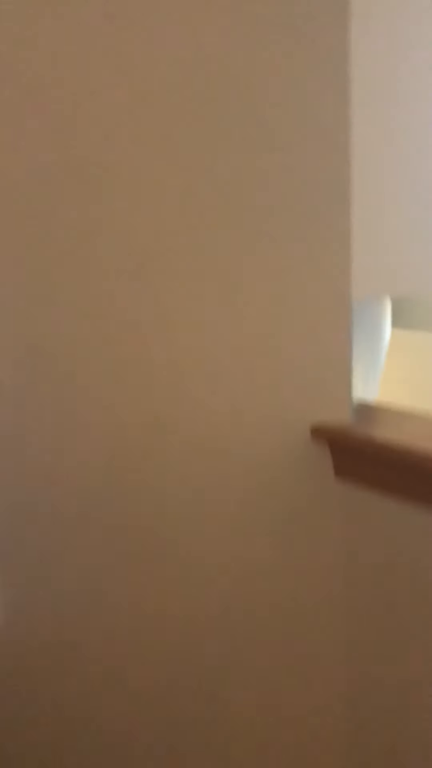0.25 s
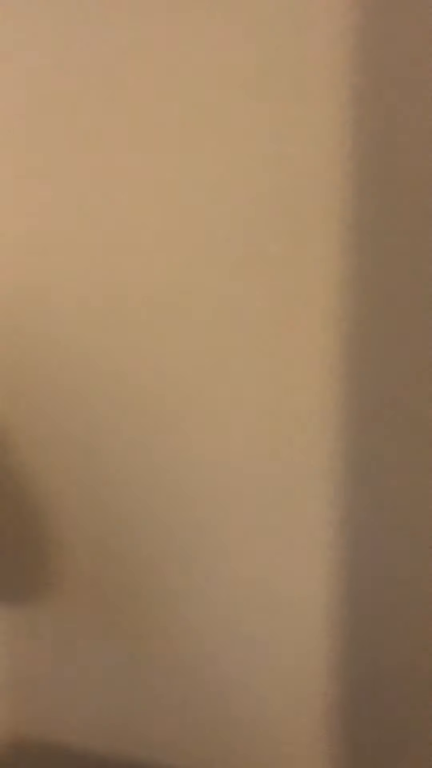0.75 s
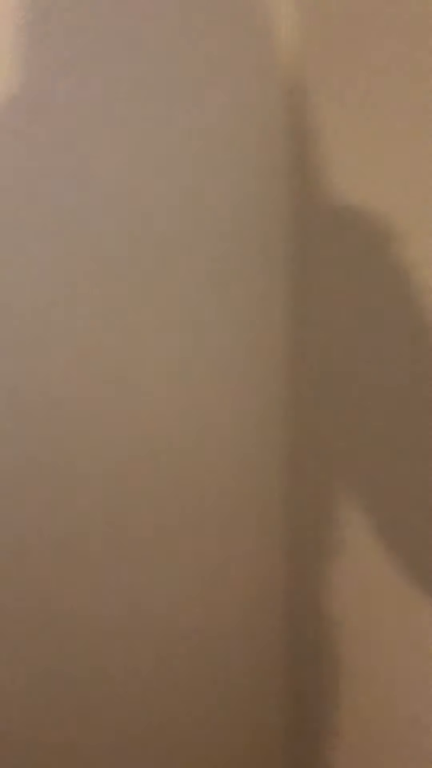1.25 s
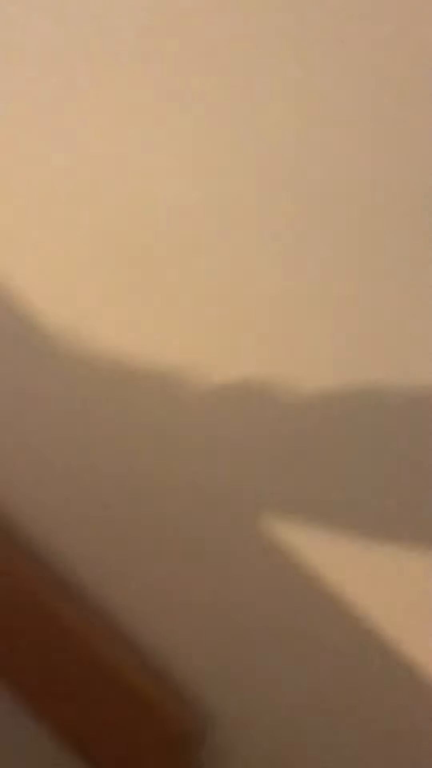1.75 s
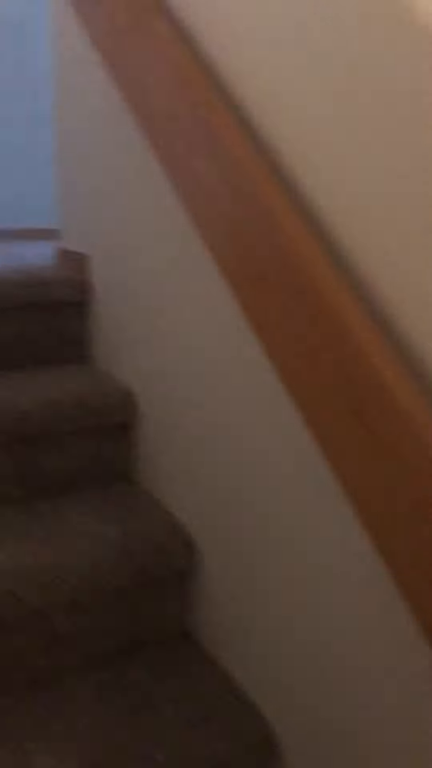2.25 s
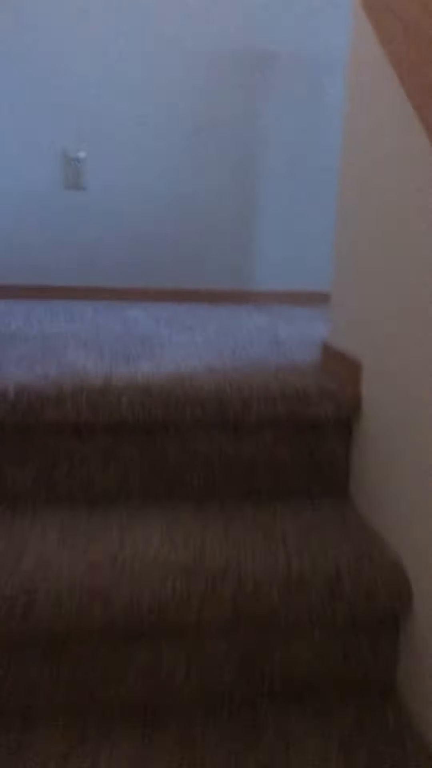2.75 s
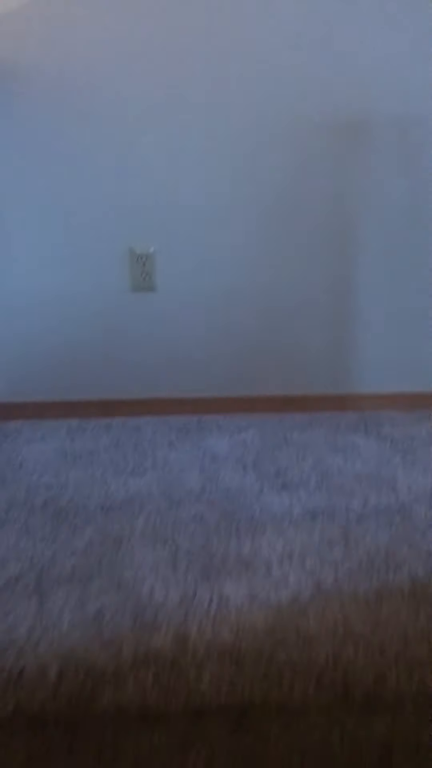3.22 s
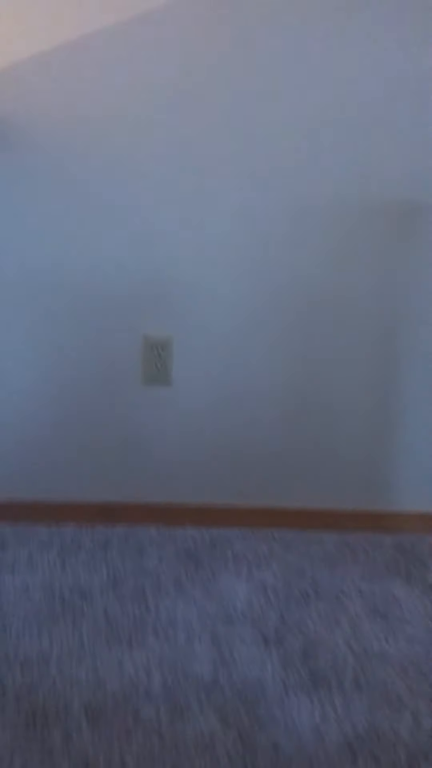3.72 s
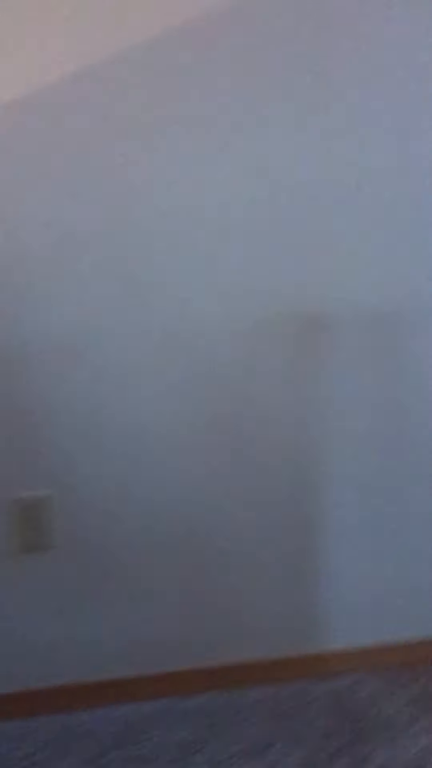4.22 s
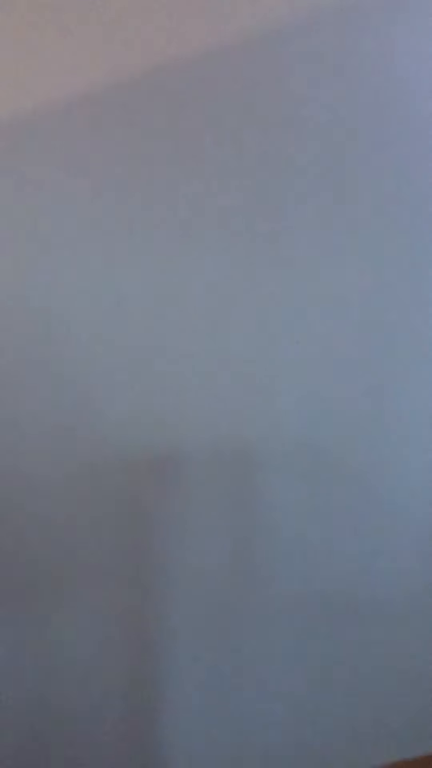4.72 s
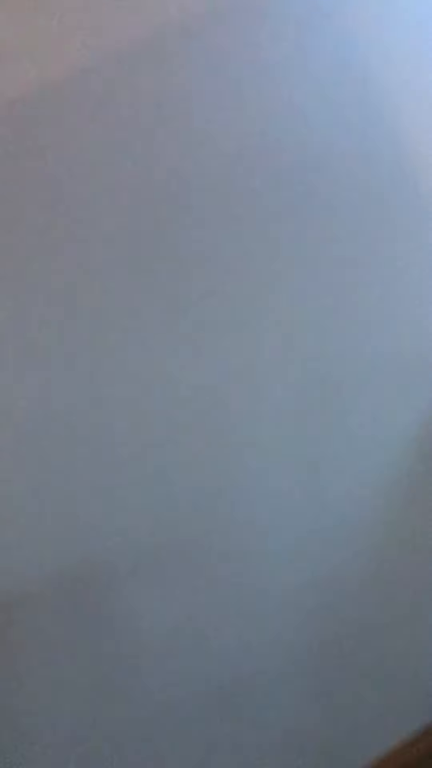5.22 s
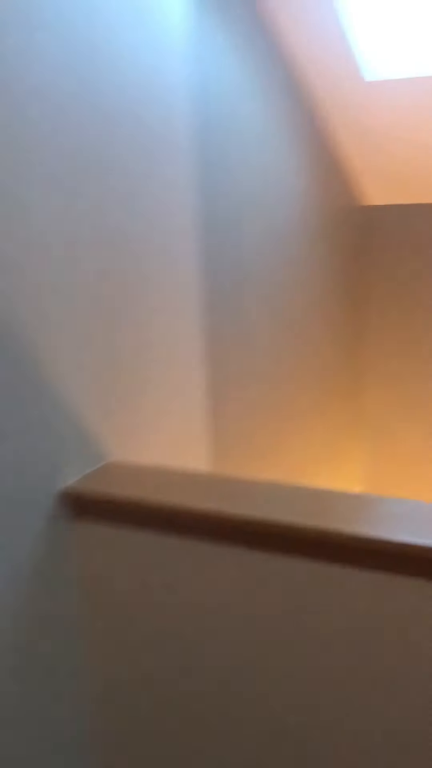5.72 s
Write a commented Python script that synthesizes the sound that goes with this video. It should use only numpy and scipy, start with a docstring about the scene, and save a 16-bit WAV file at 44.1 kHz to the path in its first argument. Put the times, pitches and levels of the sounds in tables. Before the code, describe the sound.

A person climbs carpeted wooden stairs, then walks across a carpeted landing. Each step is a dull, bassy thump with a soft puff of pile and tiny ticks of shoe or laces. Steps come about every half second, strongest around the middle. Clothes rustle faintly, boards creak very softly, a distant motor hums. A handheld phone close to the walker picks up a short bare-stairwell echo.

```python
"""A deep, soft footfall comes first: someone climbs carpeted wooden stairs and crosses a landing, phone in hand.
Footfalls ring the joists as fading sine waves; trapped air knocks as short swelling sines.
Puffs from the pile, ticks of shoe and laces and rubbing cloth are short bursts of coloured noise.
Behind them the frame rumbles, boards creak, feet shuffle and clothes rustle under a fine hiss (shaped noise).
A far motor hums on multiples of its speed, and the bare stairwell answers with fading random echoes."""
import sys
import numpy as np
from scipy import signal
from scipy.fft import rfft, irfft, next_fast_len
from scipy.io import wavfile
from scipy.ndimage import uniform_filter1d, map_coordinates

SR = 44100
rng = np.random.default_rng(int(sys.argv[2]) if len(sys.argv) > 2 else 0)


def digitize_waveform(pressure):
    """Quantize a signal to 16-bit integers and store it at the path in sys.argv[1].

    Rows of a 2-D input are taken as channels; values are limited to [-1, 1].
    """
    field = np.atleast_2d(pressure).T
    bounded = np.clip(field, -1, 1)
    quanta = np.round(bounded * 32767).astype(np.int16)
    wavfile.write(sys.argv[1], SR, quanta)


N = 263232  # length in samples

# Pushes on the treads, from heel knock to the weight rolling over:
# [t/s, peak level/dB, best driven f/Hz, spread/octaves, t60/s at that pitch]; t60 = time to fade by 60 dB
TREAD_PUSHES = [(0.0, -26.5, 61.6, 0.36, 0.35), (0.004, -37, 215, 0.52, 0.083),
                (0.096, -40.5, 59, 0.65, 0.38), (0.386, -36, 244, 0.41, 0.11),
                (0.414, -30.5, 55.5, 0.6, 0.34), (0.459, -25.5, 53.3, 0.19, 0.29),
                (0.622, -48, 62, 0.55, 0.094), (0.929, -31, 92, .22, 0.41), (0.944, -32.5, 208, 0.36, 0.11),
                (0.951, -23, 90.6, 0.2, 0.21), (0.991, -43, 96, .48, 0.064), (1.039, -32, 93, 0.36, 0.14),
                (1.475, -38, 82.4, .32, 0.29), (1.543, -39, 66, 0.42, 0.39), (1.65, -39.5, 87, 0.2, 0.15),
                (1.663, -46.5, 265, 0.23, 0.21), (1.686, -36, 81.8, 0.39, .18),
                (1.751, -37.5, 91, 0.61, .15), (1.824, -48, 265, 0.15, 0.15), (1.827, -39.5, 80, 0.41, .18),
                (2.008, -41.5, 295, 0.24, 0.14), (2.052, -33.5, 90, 0.41, 0.17),
                (2.121, -54, 74, .28, 0.46), (2.488, -43.5, 96.5, 0.22, 0.16),
                (2.557, -37.5, 79, 0.12, 0.55), (2.616, -39, 233, 0.39, 0.19), (2.639, -33, 67.6, .5, 0.27),
                (2.659, -25.5, 76, 0.16, 0.25), (2.704, -46, 73, 0.37, 0.21),
                (2.758, -44.5, 59.3, .5, 0.51), (2.837, -37.5, 69.7, 0.14, 0.13),
                (3.108, -35.5, 251, 0.64, 0.16), (3.111, -23.5, 94.3, 0.4, 0.23),
                (3.139, -20, 57.3, 0.4, 0.23), (3.172, -41, 71, 0.36, 0.15), (3.26, -41, 51, 0.38, .22),
                (3.329, -39.5, 56.4, 0.2, 0.64), (3.542, -30.5, 230, 0.33, 0.25),
                (3.542, -23.5, 102, 0.34, 0.24), (3.559, -20.5, 85, 0.41, 0.13),
                (3.619, -36, 79.5, 0.65, 0.11), (3.682, -33, 49, 0.34, 0.35), (3.964, -25, 173, 0.52, 0.29),
                (3.984, -22.5, 153, 0.26, 0.092), (4.022, -33.5, 143, 0.32, 0.18),
                (4.04, -50, 77, 0.56, .22), (4.082, -33, 81, 0.63, 0.14), (4.14, -42, 144, 0.21, .09),
                (4.19, -37, 63, 0.35, 0.076), (4.27, -47, 72.6, 0.23, 0.38),
                (4.446, -36.5, 198, 0.51, 0.27), (4.447, -33, 99, .36, 0.15), (4.47, -33, 89, 0.26, 0.11),
                (4.529, -37.5, 68.5, 0.51, .2), (4.62, -39, 72, 0.35, 0.11), (4.955, -35.5, 236, 0.3, 0.28),
                (5.0, -37.5, 55.4, .32, 0.098), (5.04, -37.5, 69.3, .5, 0.29),
                (5.133, -52.5, 307, 0.17, 0.46), (5.516, -32, 76.6, 0.22, 0.48),
                (5.531, -40.5, 126.6, 0.14, 0.31), (5.534, -27, 75.5, 0.13, 0.32),
                (5.564, -47.5, 233, 0.13, 0.38), (5.597, -42, 71, .3, 0.47)]
# Ringing modes of the joists: [f/Hz, level/dB]
JOIST_MODES = [(40, 11), (48, 0.5), (54, 2.5), (62, -0.5), (70, 2), (84, 5), (101, 7), (124, 9), (148, 9.5),
               (178, 5.5), (215, 0.5), (255, 0.5), (310, 2.5), (370, 8), (440, 0)]
# Air pockets slapped shut under the sole: [t/s, peak level/dB, f/Hz]
AIR_KNOCKS = [(0.394, -32.5, 1230), (0.428, -49, 1200), (0.941, -44, 536), (0.947, -37.5, 900),
              (1.564, -47, 794), (1.782, -54, 683), (2.202, -48, 1360), (2.612, -31, 1225),
              (2.687, -45, 563), (3.543, -28.5, 1260), (3.964, -41, 1250), (3.966, -48, 543),
              (4.481, -45.5, 1360), (5.508, -32.5, 1350), (5.515, -41, 1080)]
# The sole crushes the pile: [t/s, level/dB, slope/dB per octave, t60/s]
PILE_PUFFS = [(0.0, -38.5, -6.5, 0.029), (0.38, -47, -5.5, 0.25), (0.917, -38, -6, 0.12),
              (0.94, -30.5, -11.5, 0.047), (1.471, -46.5, -5, 0.21), (1.564, -51.5, -5, 0.2),
              (1.672, -54.5, -4, 0.05), (2.012, -43.5, -9, 0.097), (2.551, -54, -4.5, .13),
              (2.682, -40, -7.5, 0.065), (3.106, -44, -7.5, 0.15), (3.541, -41, -5.5, 0.088),
              (3.558, -40, -28, 0.047), (3.962, -43, -6.5, 0.097), (4.444, -44.5, -5, 0.076),
              (4.959, -48.5, -6, 0.14), (5.079, -55.5, -8, 0.16), (5.495, -43.5, -5.5, 0.13),
              (5.591, -52.5, -5.5, 0.21)]
# Ticks of shoe and laces: [t/s, level/dB, f/Hz, share of broad grit, treble level/dB against the rest]
SHOE_TICKS = [(0.0968, -52.5, 2370, 0.66, -21), (0.1158, -47.5, 3800, 0.16, -22),
              (0.1832, -49.5, 2630, .13, -28), (0.271, -53, 1870, 0.87, -8),
              (0.393, -45.5, 1890, 0.7, -4.5), (0.4727, -42.5, 3350, .17, -13),
              (0.5537, -47.5, 4340, 0.75, -20), (1.1009, -50, 3750, 0.17, -28),
              (1.204, -46, 3440, 0.21, -28), (1.5628, -47, 1920, 0.9, -8), (1.6751, -44, 1630, 0.095, -20),
              (2.0106, -54.5, 3670, .4, -26), (2.2009, -49.5, 1920, 0.059, -10.5),
              (2.552, -54.5, 1990, .31, -14), (2.612, -33, 4150, .5, -17), (2.6125, -35.5, 6300, 0.29, -13),
              (2.6818, -41.5, 3560, 0.31, -42), (2.7965, -43.5, 3700, .26, -30),
              (2.9574, -55.5, 3300, 0.16, -25), (3.11, -49.5, 1820, 0.26, -27),
              (3.2472, -55.5, 3670, 0.4, 0.5), (3.407, -48.5, 2550, 0.18, -31), (3.5413, -41, 2730, 1, -8),
              (3.65, -46, 3380, 0.43, -11.5), (3.7537, -47, 4000, 0.29, -18), (3.921, -43, 4150, 0.19, -28),
              (3.937, -50, 4200, .6, -10), (3.9625, -44, 1970, .4, -38), (4.1016, -52.5, 3640, .3, -1.5),
              (4.2419, -51, 2580, 0.11, -34), (4.521, -54.5, 3930, .54, -6), (4.555, -44.5, 3350, 0.79, -7),
              (4.645, -45.5, 4370, 0.67, -9), (4.818, -52.5, 2650, 0.24, -30), (4.85, -51.5, 2400, .5, -18),
              (4.864, -51.5, 2300, 0.49, -15), (4.92, -54.5, 3900, 0.2, -26),
              (4.9587, -51.5, 1800, 0.22, -6), (5.27, -54, 2700, 0.23, -29),
              (5.5068, -36.5, 2320, .97, -13), (5.5924, -45.5, 2070, 0.84, -6),
              (5.6858, -44.5, 3900, 0.47, -16), (5.9315, -57, 1940, 0.44, -27)]
# Cloth and sole rub: [t/s, level/dB, f/Hz, treble level/dB against the rest, length/s]
CLOTH_RUBS = [(0.1, -69, 2700, 0, 0.095), (0.553, -59.5, 4280, 0, 0.02), (0.742, -69, 2390, -25, 0.035),
              (0.805, -55.5, 2450, -16, 0.031), (0.9203, -51, 3770, -26, 0.015),
              (1.1004, -56.5, 3780, -13, 0.037), (1.122, -55.5, 3300, -18, 0.034),
              (1.477, -66.5, 2500, -24, 0.075), (2.628, -64, 6100, -10, 0.013),
              (2.815, -60, 3930, -30, 0.016), (2.9875, -56, 2600, -21, 0.027), (3.262, -72, 3260, 2, 0.029),
              (3.3376, -56.5, 3230, -25, 0.038), (3.534, -66, 2670, -5, .03),
              (3.658, -65, 3430, -11, 0.018), (3.797, -75, 2940, -21, .023),
              (3.855, -58.5, 2790, -29, 0.012), (3.884, -54, 2980, -19, .02),
              (3.922, -52.5, 4070, -17, 0.026), (4.1524, -57, 3470, -7.5, 0.04),
              (4.431, -65.5, 3260, -4, 0.028), (4.6594, -69.5, 2960, -11, 0.061),
              (4.845, -57, 2420, -14, 0.028), (5.1744, -61.5, 3530, -10, 0.063),
              (5.687, -64, 3700, -11, .043)]
# Broad colour shared by the small contacts: [f/Hz, level/dB]
GRIT_COLOUR = [(700, 3), (1500, 9), (3000, 5.5), (5000, 3), (6300, 2), (7500, -6), (9000, -5.5),
               (12000, -47)]
# Colours of the background noises, before each is set to rms 1: [f/Hz, level/dB]
RUMBLE_COLOUR = [(12, -63), (20, -10), (54, 11), (81, 5.5), (121, 1), (231, -15.5), (300, -21.5),
                 (390, -79), (660, -120)]
CREAK_COLOUR = [(110, -51), (180, -2), (232, -5), (333, -1), (399, -11), (500, -50), (650, -65),
                (1100, -120)]
SHUFFLE_COLOUR = [(250, -78), (420, 7), (466, 3), (746, 0.5), (963, 2), (1470, 1.5), (2000, -6.5),
                  (2600, -43), (4400, -120)]
RUSTLE_COLOUR = [(940, -38), (1600, -4.5), (1920, -1), (3980, -1.5), (4960, -6), (6180, -6.5), (7500, -13),
                 (9750, -11.5), (16500, -120)]
HISS_COLOUR = [(3820, -56), (6500, -5), (7640, -6), (9230, -6), (10500, -4.5), (11500, -3), (15100, -5),
               (16000, -7)]
# Loudness of the creaking boards over time: [t/s, level/dB]
CREAK_LEVELS = [(0.0, -61), (0.18, -69.5), (0.76, -69.5), (0.98, -63), (1.44, -65.5), (1.91, -59),
                (2.11, -59), (2.33, -66), (3.11, -67), (3.31, -65), (3.71, -67.5), (4.87, -69.5),
                (5.15, -64.5), (5.65, -66), (5.79, -70), (5.97, -70)]
# Loudness of the walker over time: [t/s, feet level/dB, clothes level/dB]
WALKER_LEVELS = [(0.0, -67.5, -69), (0.66, -71, -71.5), (0.81, -69.5, -74.5), (1.03, -65.5, -69.5),
                 (1.26, -70, -72), (1.51, -68, -72), (1.65, -67.5, -72), (2.06, -62.5, -70),
                 (2.41, -70, -72), (2.77, -67.5, -69), (3.04, -72, -73.5), (3.32, -67.5, -67.5),
                 (4.07, -68, -69), (4.24, -69, -71.5), (4.84, -74, -73.5), (5.1, -67, -69.5),
                 (5.24, -69.5, -72), (5.97, -72, -71)]
# Loudness of the fine hiss over time: [t/s, level/dB]
HISS_LEVELS = [(0.0, -77), (0.33, -69.5), (0.6, -78), (0.88, -78), (1.03, -76), (1.28, -77.5),
               (3.09, -77.5), (3.32, -72), (3.91, -79.5), (4.07, -71.5), (4.22, -77), (5.75, -78),
               (5.97, -79)]
# Speed of a distant household motor: [t/s, turns per second]
MOTOR_SPEED = [(0, 25.2), (.8, 25), (1.3, 25.6), (1.9, 25.7), (2.3, 25.3), (3, 25.2), (4.3, 26.3),
               (4.8, 26), (5.3, 25.7), (5.97, 25.5)]
# Tones of its hum: [multiple of the speed, rms level/dB]
MOTOR_TONES = [(2, -66), (3, -62), (4, -64), (5, -66), (6, -71), (7, -74), (8, -82)]
# How long the stairwell echoes: [f/Hz, t60/s]
ECHO_TIMES = [(200, 0.64), (1500, 0.31), (5000, 0.21), (12000, 0.26)]
# Peaks and dips of the phone's sound port: [f/Hz, level/dB, width/octaves]
PORT_PEAKS = [(4150, 0.5, 0.064), (4910, -1, 0.045), (6080, 1.5, 0.054), (6580, 1, 0.025), (7100, 2, 0.038),
              (7700, -2, 0.024), (8440, 0.5, 0.052), (10400, -2.5, 0.045)]

PUSH_RISE_CYCLES = 0.63  # rise of a push, in cycles of its pitch
KNOCK_CYCLES = 1.47  # swell time of a knock, in cycles of its pitch
PUFF_RISE_SHARE = 0.079  # rise of a puff, as a share of its t60
TICK_T60_S, SNAP_T60_S, TICK_RISE_S = 0.025, 0.0027, 0.00088
RUB_OCTAVES, RUB_RISE_S = 0.3, 0.0072
RIPPLE_DB, RIPPLE_HZ = 2.5, 800  # uneven colour of each contact: depth, spacing
REST_DB = -59.5  # rumble of the frame at rest
AFTER_DB, AFTER_RISE_S, AFTER_T60_S = -18.5, 0.017, 0.97  # rumble after a push, against its peak
ECHO_DB, SLAP_ECHO_DB = -5.0, -9  # all echoes; extra cut for slaps, which reach the walls less
TOP_HZ = 15830  # band limit of the phone


def booms():
    """Each push rings the joist modes near the pitch that its spot on the tread drives best."""
    out, t = np.zeros(N), np.arange(2 * SR // 5) / SR
    mode_hz, mode_db = np.transpose(JOIST_MODES)
    for s, db, centre_hz, spread, t60 in TREAD_PUSHES:
        size = amp(mode_db + rng.normal(0, 1, len(mode_hz))) * hump(mode_hz, centre_hz, spread)
        detuned_hz = mode_hz * (1 + 0.019 * rng.standard_normal(len(mode_hz)))
        life = t60 * (centre_hz / mode_hz) ** 1.46  # higher modes lose energy faster
        on = size > size.max() / 100  # skip the very faint modes
        fade = np.exp(-np.log(1000) * t / life[on, None])
        waves = np.sin(2 * np.pi * detuned_hz[on, None] * t)
        ring = size[on] @ (fade * waves)
        ring *= (1 - np.exp(-t * centre_hz / PUSH_RISE_CYCLES)) ** 2  # carpet spreads the blow
        add(out, s - .006, amp(db) * ring / np.abs(ring).max())
    return out


def knocks():
    """Air trapped under the sole swings for a few cycles: it swells as the sole closes and dies quickly."""
    out, t = np.zeros(N), np.arange(SR // 50) / SR
    for s, db, hz in AIR_KNOCKS:
        u = t * hz / KNOCK_CYCLES
        swell = u ** 2 * np.exp(2 - 2 * u)  # reaches 1 at u = 1
        add(out, s - .0005, amp(db) * swell * np.sin(2 * np.pi * (hz * t + rng.random())))
    return out


def puffs():
    """Air and fibres squeezed under the sole: dull noise that fades away."""
    out, t = np.zeros(N), np.arange(SR // 4) / SR
    for s, db, slope_db, t60 in PILE_PUFFS:
        colour = lambda f: amp(slope_db * np.log2((f + 1) / 600)) / (1 + (330 / (f + 1)) ** 4)
        air = unit(filtered(rng.standard_normal(len(t)), colour))
        rise = 1 - np.exp(-t / (PUFF_RISE_SHARE * t60))
        add(out, s - .002, amp(db - 60 * t / t60) * rise * air)
    return out


def ticks():
    """A hard contact of shoe or lace: a sharp snap with a short gritty tail."""
    out, t = np.zeros(N), np.arange(SR // 10) / SR
    fade = amp(-60 * t / TICK_T60_S) + 1.3 * amp(-60 * t / SNAP_T60_S)
    blow = fade * (1 - np.exp(-t / TICK_RISE_S))
    for s, db, hz, broad, treble_db in SHOE_TICKS:
        grit = scratch(rng.standard_normal(len(t)), hz, 0.21, broad, treble_db)
        add(out, s - .0005, amp(db) * blow * grit)
    return out


def rubs():
    """Fibres slip one by one, in clumps, while the stroke lasts."""
    out, t = np.zeros(N), np.arange(SR // 5) / SR
    for s, db, hz, treble_db, length in CLOTH_RUBS:
        sparse = rng.random(len(t)) < .02  # a few strong slips over a weak bed
        slips = rng.standard_normal(len(t)) * (.07 + sparse)
        clumps = amp(2 * map_coordinates(rng.standard_normal(64), [t * 200]))  # 200 chance levels a second
        stroke = (1 - np.exp(-t / RUB_RISE_S)) * np.exp(-(t / length) ** 3)
        add(out, s - .002, amp(db) * stroke * clumps * scratch(slips, hz, RUB_OCTAVES, .1, treble_db))
    return out


def scratch(drive, hz, octaves, broad, treble_db):
    """Colours a contact: its own pitch, a broad grit and a treble hump, with chance peaks and dips."""
    knots = rng.standard_normal(128)
    ripple = lambda f: amp(RIPPLE_DB * map_coordinates(knots, [f / RIPPLE_HZ], order=1))
    colour = lambda f: hump(f, hz, octaves) + broad * amp(along(GRIT_COLOUR, f))
    body = unit(filtered(drive, lambda f: ripple(f) * colour(f)))
    treble = unit(filtered(drive, lambda f: ripple(f) * hump(f, 10000, octaves=0.84)))
    return body + amp(treble_db) * treble


def walker():
    """Feet shuffle and clothes rustle: many tiny contacts blur into patchy noise."""
    shuffle_db, rustle_db = curves(WALKER_LEVELS)
    shuffle = amp(shuffle_db) * rush(SHUFFLE_COLOUR, patchy_db=2.5)
    return shuffle + amp(rustle_db) * rush(RUSTLE_COLOUR, patchy_db=2.0)


def frame():
    """The frame rumbles, strongest in the joist modes, and its boards creak softly as patchy noise."""
    joists = lambda f: 2.0 + sum(amp(db) * hump(f, hz, octaves=0.075) for hz, db in JOIST_MODES)
    rumble = unit(filtered(rush(RUMBLE_COLOUR, patchy_db=2.2), joists))
    creak_db, = curves(CREAK_LEVELS)
    return shaking() * rumble + amp(creak_db) * rush(CREAK_COLOUR, patchy_db=3.0)


def shaking():
    """How hard the frame shakes: a resting level, plus a swell that every push leaves behind."""
    blows, t = np.zeros(N), np.arange(SR) / SR
    for s, db, *_ in TREAD_PUSHES:
        add(blows, s, amp([2 * (db + AFTER_DB)]))  # doubled dB: powers add up, not levels
    swell = (amp(-60 * t / AFTER_T60_S) * (1 - np.exp(-t / AFTER_RISE_S))) ** 2
    after = np.abs(signal.fftconvolve(blows, swell)[:N])
    return np.sqrt(amp(2 * REST_DB) + after)


def motor():
    """A far motor hums through the walls on multiples of its shaft speed."""
    turns = np.cumsum(np.interp(np.arange(N) / SR, *np.transpose(MOTOR_SPEED))) / SR
    tone = lambda k: np.sin(2 * np.pi * (k * turns + rng.random()))
    return sum(np.sqrt(2) * amp(db) * tone(k) for k, db in MOTOR_TONES)


def hiss():
    """A fine, nearly even high noise whose level drifts."""
    hiss_db, = curves(HISS_LEVELS)
    return amp(hiss_db) * rush(HISS_COLOUR, patchy_db=0.5)


def stairwell(x):
    """Bare walls answer with fading random echoes; each frequency dies at its own speed."""
    out, span = np.zeros(N), SR // 5  # the echo pattern is drawn anew every 0.2 s
    for start in range(0, N, span):
        hz, t, z = signal.stft(rng.standard_normal(SR // 2), SR, nperseg=256)
        fade = amp(-60 * t / along(ECHO_TIMES, hz)[:, None])
        tail = signal.istft(z * fade, SR, nperseg=256)[1]
        echoes = signal.fftconvolve(x[start:start + span], tail / np.linalg.norm(tail))
        add(out, start / SR + .005, echoes)
    return out


def rush(spectrum, patchy_db):
    """Coloured noise of rms 1 with patches of random gain in time and pitch."""
    z = signal.stft(rng.standard_normal(N + 512), nperseg=512)[2]
    field = uniform_filter1d(rng.standard_normal(z.shape), size=10, axis=0)
    field = uniform_filter1d(field, size=5, axis=1)
    x = signal.istft(z * amp(patchy_db * unit(field)), nperseg=512)[1][:N]
    return unit(filtered(x, lambda hz: amp(along(spectrum, hz))))


def curves(rows):
    """One value per sample for each column after the time."""
    s, *cols = np.transpose(rows)
    return [np.interp(np.arange(N) / SR, s, c) for c in cols]


def amp(db):
    """dB to gain."""
    return 10 ** (np.asarray(db) / 20)


def unit(x):
    """x at rms 1."""
    return x / np.sqrt(np.mean(x ** 2) + 1e-20)


def along(points, hz):
    """Reads between (Hz, value) points on a log pitch axis."""
    f, v = np.transpose(points)
    return np.interp(np.log(hz + 1), np.log(f + 1), v)


def filtered(x, response):
    """x with each frequency scaled by response(Hz)."""
    m = next_fast_len(len(x) + 8192)
    return irfft(rfft(x, m) * response(np.fft.rfftfreq(m, 1 / SR)), m)[:len(x)]


def hump(hz, centre_hz, octaves):
    """A bell-shaped gain on a log pitch axis."""
    return np.exp(-.5 * (np.log2((hz + 1) / centre_hz) / octaves) ** 2)


def add(track, s, sound):
    """Mixes a sound into the track from s seconds on."""
    part = track[max(round(s * SR), 0):][:len(sound)]
    part += sound[:len(part)]


def scene():
    """Footfalls and small contacts with their echoes, over the walker's rustle and the house."""
    contacts, slaps = puffs() + ticks() + rubs(), knocks()
    echoes = amp(ECHO_DB) * stairwell(contacts + amp(SLAP_ECHO_DB) * slaps)
    background = walker() + frame() + motor() + hiss()
    return (booms() + slaps + contacts + echoes + background)[None]


def record(dry):
    """The phone colours the treble, keeps little deep bass and nothing above its band limit."""
    port_db = lambda hz: sum(db * hump(hz, centre_hz, octaves) for centre_hz, db, octaves in PORT_PEAKS)
    bass_cut = lambda hz: 1 / np.sqrt(1 + (38 / (hz + 1)) ** 4)
    return filtered(dry[0], lambda hz: amp(port_db(hz)) * (hz < TOP_HZ) * bass_cut(hz))[None]


dry = scene()
out = record(dry)
digitize_waveform(out)
```